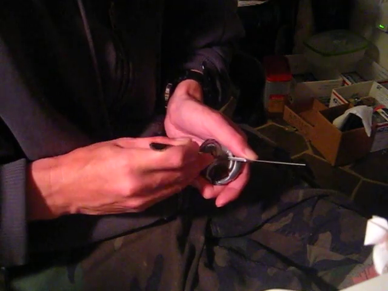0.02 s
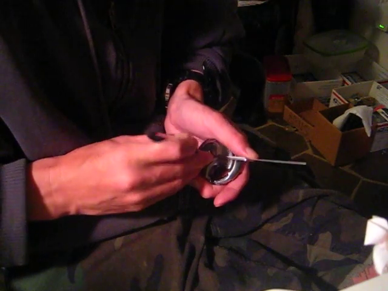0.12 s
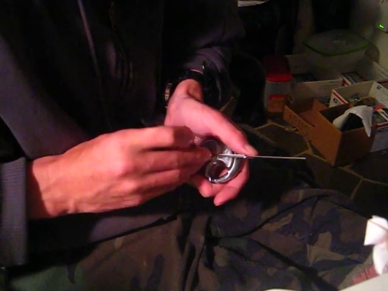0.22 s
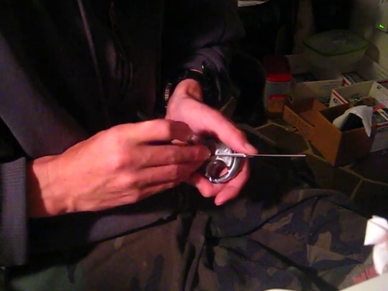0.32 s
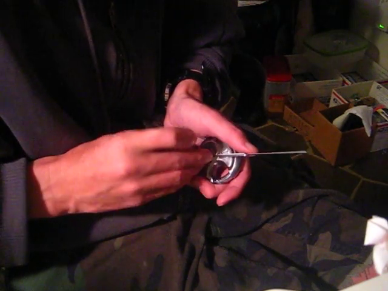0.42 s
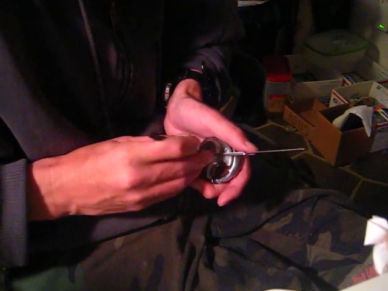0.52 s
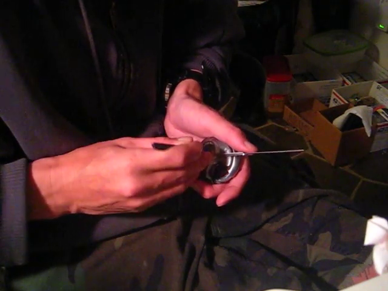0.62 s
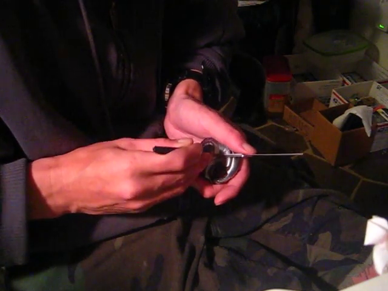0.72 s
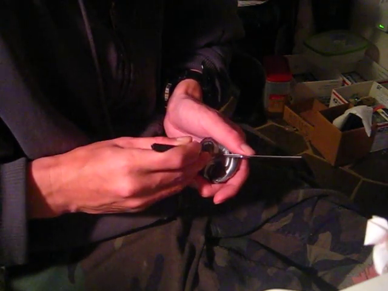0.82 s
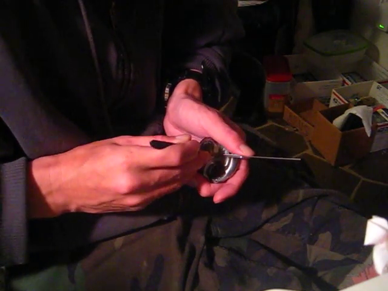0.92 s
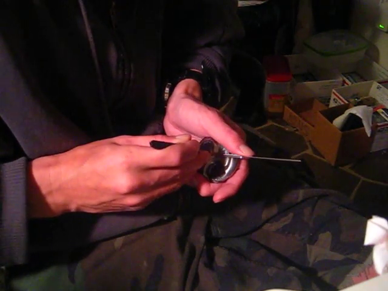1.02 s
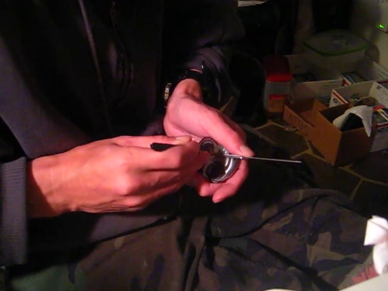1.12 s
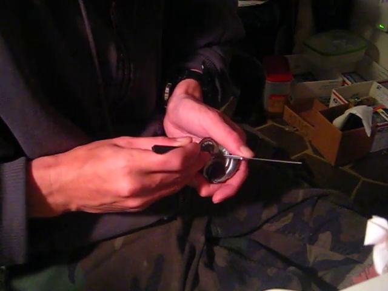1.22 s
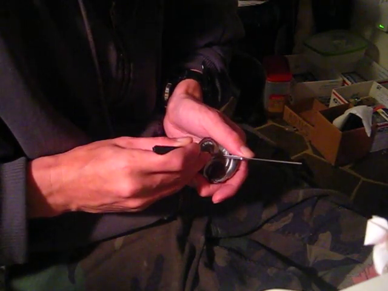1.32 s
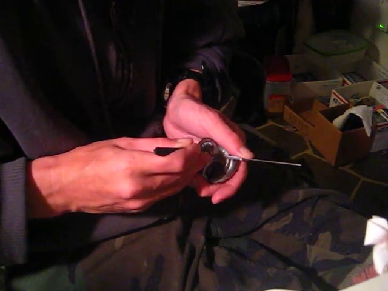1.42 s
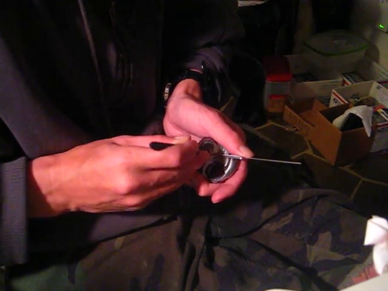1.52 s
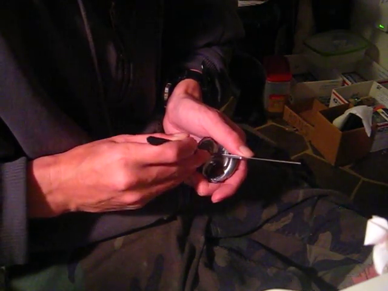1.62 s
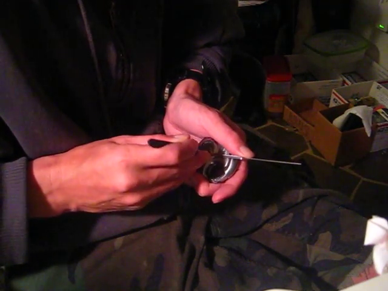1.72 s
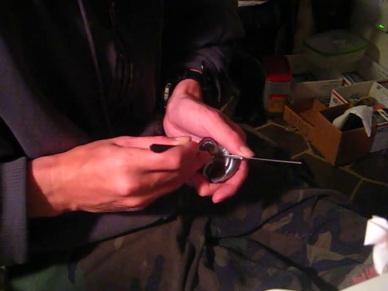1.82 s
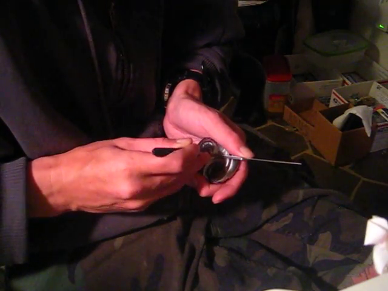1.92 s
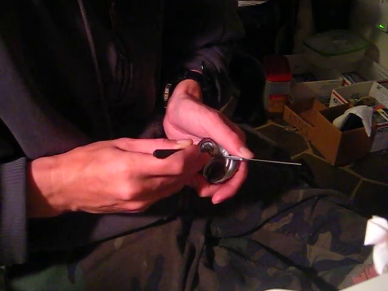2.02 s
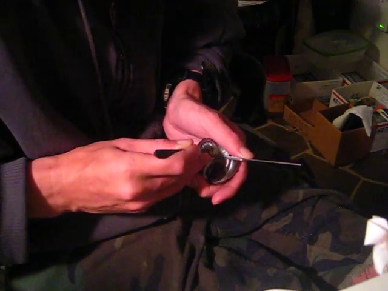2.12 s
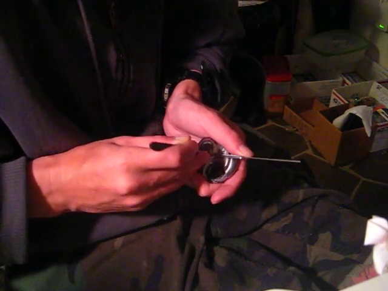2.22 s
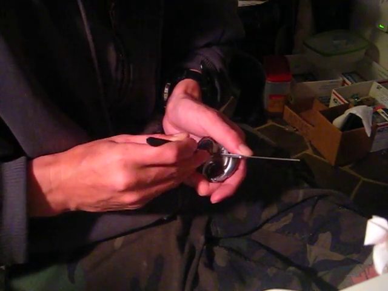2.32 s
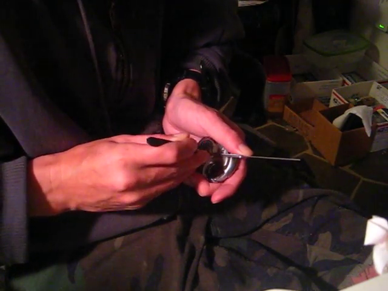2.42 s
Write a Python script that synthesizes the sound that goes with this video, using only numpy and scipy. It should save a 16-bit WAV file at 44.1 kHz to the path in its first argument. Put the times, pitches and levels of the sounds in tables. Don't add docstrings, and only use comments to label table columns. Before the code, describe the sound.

Lock pick slipping off pins in a hand-held padlock, short bright choked clicks crowded at the start, near silence with barely audible scraping, then sparse late clicks; small damped room, camera hiss and thin high whine.

```python
import sys
import numpy as np
from scipy import signal
from scipy.fft import rfft, irfft
from scipy.io import wavfile
from scipy.ndimage import uniform_filter1d

SR = 44100
rng = np.random.default_rng(int(sys.argv[2]) if len(sys.argv) > 2 else 0)


def materialize(psi):
    bounded = np.clip(np.atleast_2d(psi).T, -1, 1)
    quanta = np.round(bounded * 32767).astype(np.int16)
    wavfile.write(sys.argv[1], SR, quanta)


def gain_from_db(level_db):
    decades = np.asarray(level_db, float) / 20
    return 10 ** decades


N = 110250


def convolve(x, h):
    return signal.fftconvolve(x, h)[:len(x)]


def ring(hz, t60, size=4096, turn=0):
    t = np.arange(size) / SR
    return np.sin(2 * np.pi * (hz * t + turn)) * np.exp(-np.log(1000) * t / t60)


def walk(rate):
    k = int(SR / rate)
    steps = np.repeat(rng.standard_normal(N // k + 1), k)
    drift = uniform_filter1d(uniform_filter1d(steps, k), k)[:N]
    return drift / drift.std()


# frequency in Hz, level in dB per Hz.
HISS_SPECTRUM = [(20, -2.5), (60, 2), (250, -0.5), (900, -4.5), (3000, -6.5), (8300, -11), (13000, -12),
                 (16000, -13.5)]
# centre in Hz, width in Hz, gain in dB.
HOUSING_PEAKS = [
    (5470, 1000, 2),
    (10780, 1760, 8.5),
    (13000, 760, -2),
    (13900, 1000, 5),
]
CAMERA_TOP_HZ = 15775


def hiss():
    f = np.fft.rfftfreq(N, 1 / SR) + 1
    hz, level = np.array(HISS_SPECTRUM).T
    db = np.interp(np.log(f), np.log(hz), level)
    for centre, width, gain in HOUSING_PEAKS:
        db = db + gain * np.exp(-0.5 * ((f - centre) / (width / 2)) ** 2)
    spectrum = rfft(rng.standard_normal(N)) * gain_from_db(db) * (f < CAMERA_TOP_HZ)
    low = 1 / (1 + (f / 600) ** 4)
    swell = gain_from_db(2.2 * walk(50))
    x = irfft(spectrum * low, N) * swell + irfft(spectrum * (1 - low), N)
    return x * gain_from_db(-50) / x.std()


def tone(cycles, db):
    return np.sqrt(2) * gain_from_db(db) * np.sin(2 * np.pi * cycles)


def whine():
    FRAME_HZ, LINE_HZ, SENSOR_HZ, CLOCK_HZ = 30, 15734.26, 7568.5, 11622.5
    SENSOR_RESET_S, LINE_FLIP_S = 0.0174, 0.0215
    t = np.arange(N) / SR
    sensor = SENSOR_HZ * ((t - SENSOR_RESET_S) % (1 / FRAME_HZ))
    flip = np.floor((t - LINE_FLIP_S) * LINE_HZ / 525) / 2
    x = tone(sensor, -57) + tone(2 * sensor, -61.5)
    x += tone(LINE_HZ / 2 * t + flip, -61)
    x += tone(LINE_HZ * t, -77) + tone(CLOCK_HZ * t, -72)
    return irfft(rfft(x) * (np.fft.rfftfreq(N, 1 / SR) < CAMERA_TOP_HZ), N)


# frequency in Hz, level in dB, t60 in seconds.
LOCK_MODES = [(1750, 3, 0.007), (2300, -5, 0.0066), (2992, 0.5, 0.017), (3950, 6, 0.0072),
              (4660, -1.5, 0.014), (5400, 3, 0.01), (6320, 5, 0.0083), (7100, -7.5, 0.028),
              (7800, 6, 0.0072), (8860, 3, 0.009), (10000, 4.5, 0.015), (11200, 1, 0.0088),
              (13700, 5, 0.011), (14550, -1, .008)]


def slip(main_hz, second_hz, second_db):
    HOLD_S, GRIP_S, LEFT_DB = 0.0013, 0.00033, -12
    REACH_OCT = 0.26
    STRAY_DB, SCATTER_DB, DETUNE, LAG_CYCLES = -17, 1, 0.01, 1.3
    CRACK_DB, CRACK_S = -10.5, 0.00052
    hz, db, t60 = np.array(LOCK_MODES).T
    count = len(hz)
    t = np.arange(1024) / SR
    hard = np.clip(main_hz / 6000, 0, 1) ** 0.5
    near_main = np.exp(-0.5 * (np.log2(hz / main_hz) / REACH_OCT) ** 2)
    near_second = np.exp(-0.5 * (np.log2(hz / second_hz) / REACH_OCT) ** 2)
    share = near_main + gain_from_db(second_db) * near_second + gain_from_db(STRAY_DB) * hard
    gains = share * gain_from_db(db + SCATTER_DB * rng.standard_normal(count))
    bent = hz * (1 + DETUNE * rng.standard_normal(count))
    turns = 0.19 * np.arange(count) ** 2
    click = np.zeros(1024)
    for gain, f, decay, turn in zip(gains, bent, t60, turns):
        build = 1 - np.exp(-t * f / LAG_CYCLES)
        click += gain * ring(f, decay, size=1024, turn=turn) * build
    choke = gain_from_db(LEFT_DB) + (1 - gain_from_db(LEFT_DB)) * np.exp(-np.clip(t - HOLD_S, 0, 1) / GRIP_S)
    click *= choke
    click /= np.abs(click).max()
    click[:128] += gain_from_db(CRACK_DB) * hard * rng.standard_normal(128) * np.exp(-t[:128] / CRACK_S)
    return click


# start in seconds, peak in dB, main ring in Hz, second ring in Hz,
# second ring in dB.
SLIPS = [(0.0421, -27, 3060, 3950, -12), (0.1416, -30, 6440, 4260, -2), (0.2004, -29, 10600, 4020, -4),
         (0.203, -18, 9600, 3160, 1.5), (.3640, -17.5, 8000, 4100, -4.5), (0.3989, -33, 4400, 7600, -10),
         (0.4074, -30, 3100, 4000, -9), (0.4335, -30.5, 3100, 5400, -3), (0.4435, -5.5, 7100, 5200, -10.5),
         (.5050, -27, 5900, 9500, -3), (1.533, -38, 3750, 3180, -3.5), (1.5374, -20, 3950, 3100, -16),
         (1.9350, -19.5, 10000, 4700, 0), (2.1127, -22, 10000, 7800, -18), (.0500, -41, 3050, 3950, -12),
         (.4110, -36, 3300, 4500, -2), (.4546, -29, 6800, 8000, -3), (1.5457, -35, 3300, 4000, 0),
         (1.9455, -38, 10000, 8000, -3), (2.1140, -31, 3120, 4900, -4)]


def pick():
    out = np.zeros(N)
    for start, peak_db, main_hz, second_hz, second_db in SLIPS:
        at = int(start * SR)
        out[at:at + 1024] += gain_from_db(peak_db) * slip(main_hz, second_hz, second_db)
    return out


# delay in seconds, level in dB.
ECHOES_NEARBY = [(.0032, -20), (.0076, -13), (0.0115, -25), (.0120, -36), (.0172, -39), (.0225, -32)]


def room():
    START_S, T60_S, TAIL_DB, TOP_HZ, SMEAR_S = 0.012, 0.24, -18, 8750, 0.0005
    t = np.arange(SR // 2) / SR
    tail = rng.standard_normal(len(t)) * np.exp(-np.log(1000) * t / T60_S)
    tail *= np.clip(t / START_S, 0, 1) ** 2
    tail = signal.sosfilt(signal.butter(1, TOP_HZ, fs=SR, output="sos"), tail)
    h = gain_from_db(TAIL_DB) * tail / np.sqrt(np.sum(tail ** 2))
    h[0] = 1
    for delay, db in ECHOES_NEARBY:
        at = int(delay * SR)
        smear = rng.standard_normal(96) * np.exp(-t[:96] / SMEAR_S)
        h[at:at + 96] += gain_from_db(db) * smear / np.sqrt(np.sum(smear ** 2))
    return h


# start in seconds, level in dB.
SHACKLE_SHAKES = [
    (.2055, -41),
    (0.411, -43),
    (1.539, -45),
]


def shackle():
    HZ, SPLIT_HZ, T60_S = 3070, 218, 0.056
    pair = ring(HZ, T60_S) + 0.93 * ring(HZ + SPLIT_HZ, T60_S)
    out = np.zeros(N)
    for start, db in SHACKLE_SHAKES:
        at = int(start * SR)
        out[at:at + len(pair)] += gain_from_db(db) * pair
    return out


def radiate(x):
    x = signal.sosfilt(signal.butter(2, 900, "high", fs=SR, output="sos"), x)
    return signal.sosfilt(signal.butter(10, 15600, fs=SR, output="sos"), x)


# start in seconds, length in seconds, rms level in dB.
PIN_DRAGS = [
    (.64, .26, -64),
    (1.6, .31, -63),
]
# frequency in Hz, t60 in seconds, level in dB.
DRAG_MODES = [(3000, 0.015, -3), (3380, 0.0058, -5), (3900, 0.0035, -14)]


def drag():
    TICKS_PER_S, SCATTER_DB = 2500, 2
    t = np.arange(N) / SR
    ticks = (rng.random(N) < TICKS_PER_S / SR) * rng.standard_normal(N)
    ticks *= gain_from_db(SCATTER_DB * rng.exponential(size=N))
    x = convolve(ticks, sum(gain_from_db(db) * ring(hz, t60) for hz, t60, db in DRAG_MODES))
    push = np.zeros(N)
    for start, length, db in PIN_DRAGS:
        push += gain_from_db(db) * np.sin(np.pi * np.clip((t - start) / length, 0, 1)) ** 0.2
    return x / x.std() * push


def scene():
    lock = radiate(pick() + shackle()) + drag()
    mono = convolve(lock, room()) + hiss() + whine()
    return np.array([mono, mono])


def low_pass(x):
    return signal.sosfilt(signal.butter(12, 16990, fs=SR, output="sos"), x)


def record(dry):
    return low_pass(dry)


dry = scene()
out = record(dry)
materialize(out)
```